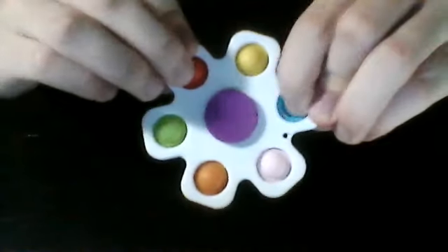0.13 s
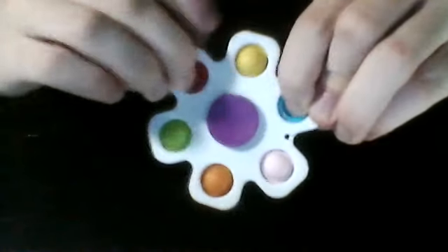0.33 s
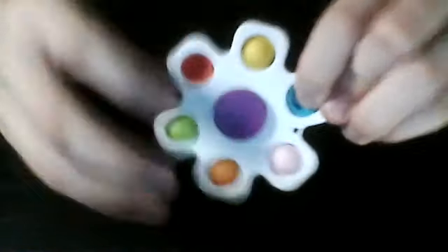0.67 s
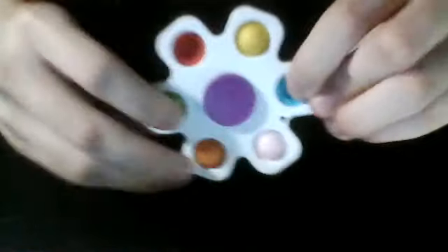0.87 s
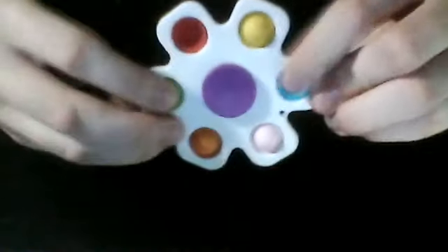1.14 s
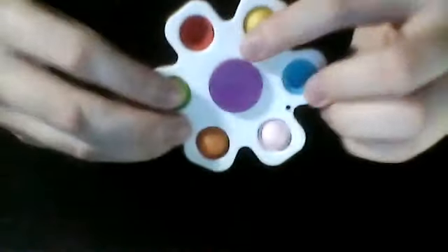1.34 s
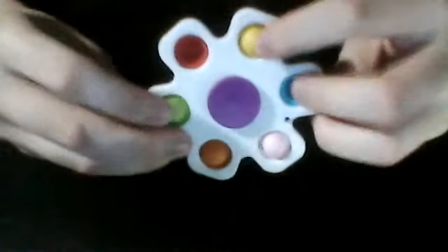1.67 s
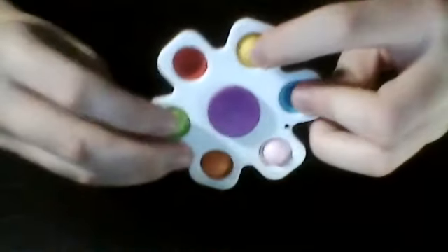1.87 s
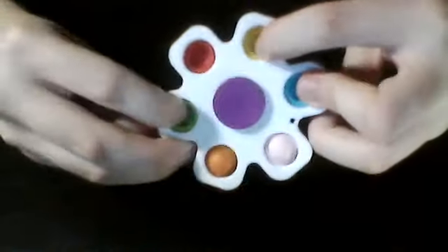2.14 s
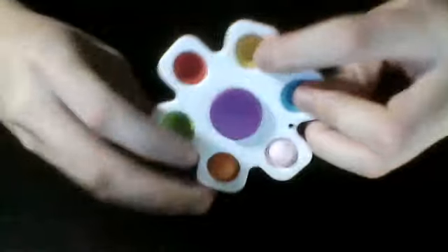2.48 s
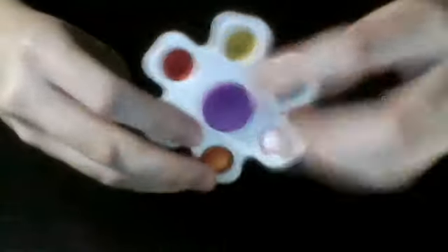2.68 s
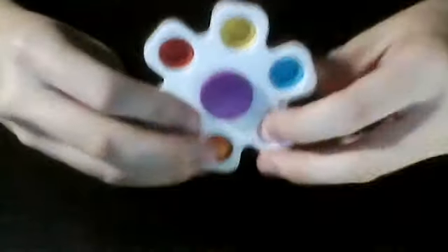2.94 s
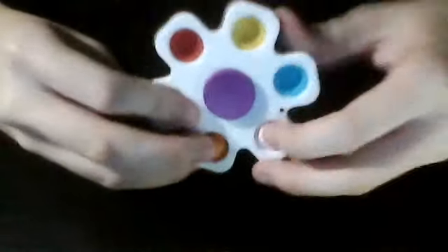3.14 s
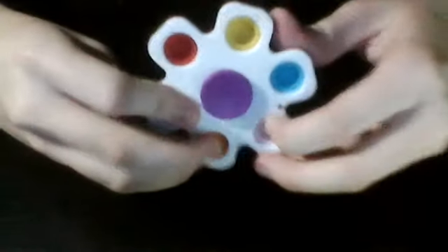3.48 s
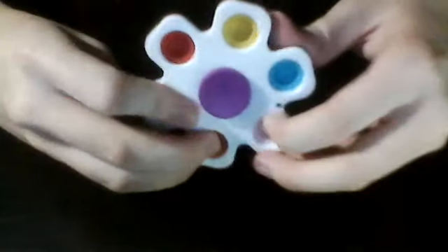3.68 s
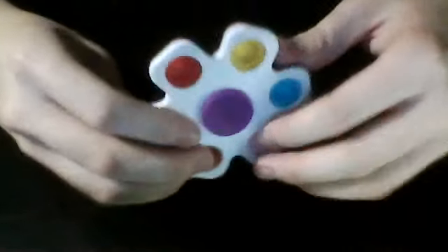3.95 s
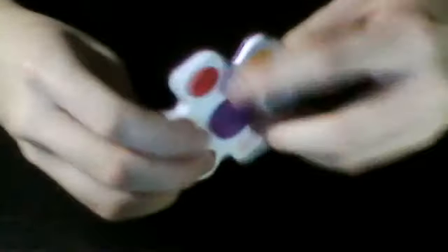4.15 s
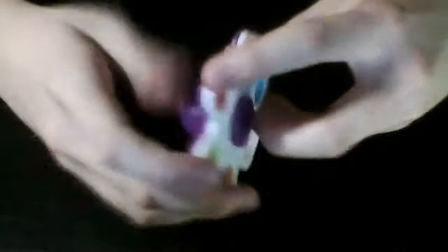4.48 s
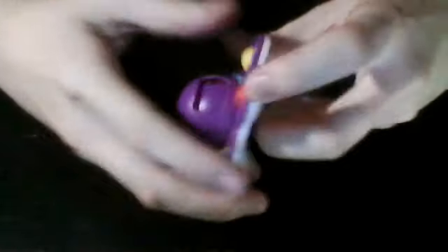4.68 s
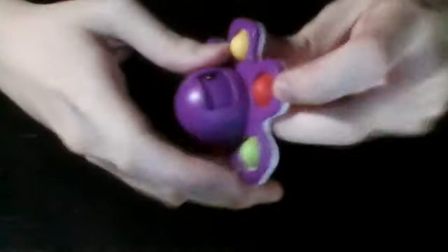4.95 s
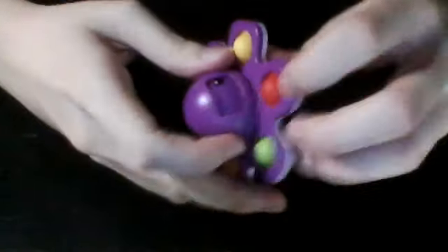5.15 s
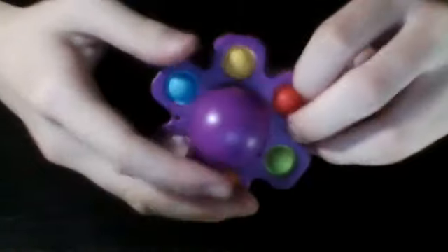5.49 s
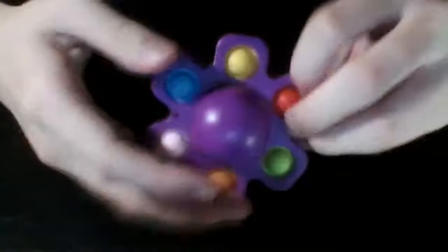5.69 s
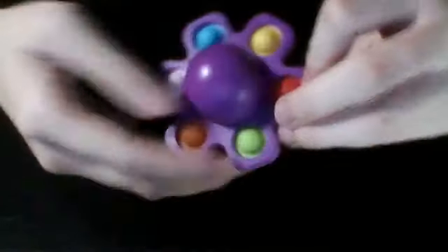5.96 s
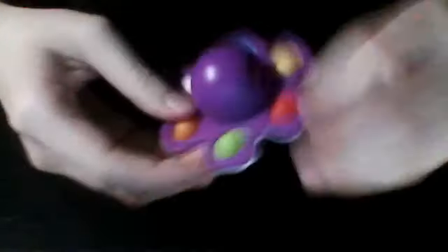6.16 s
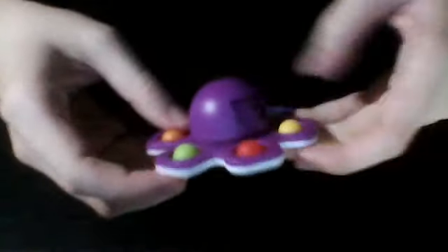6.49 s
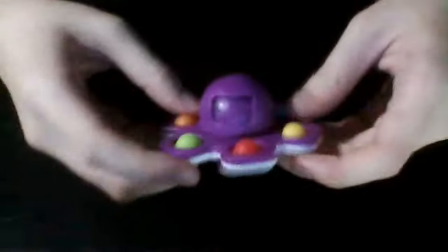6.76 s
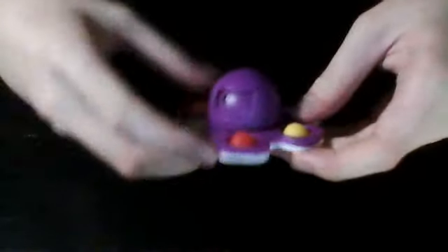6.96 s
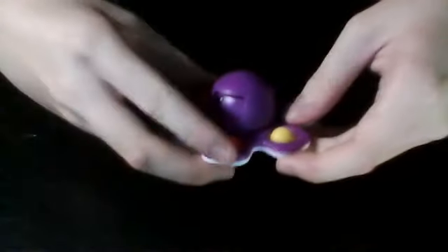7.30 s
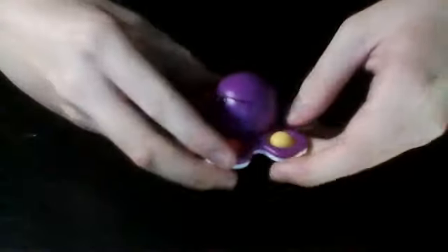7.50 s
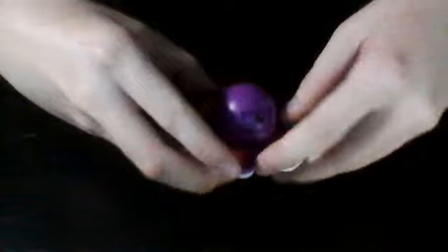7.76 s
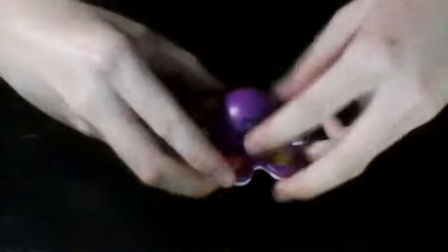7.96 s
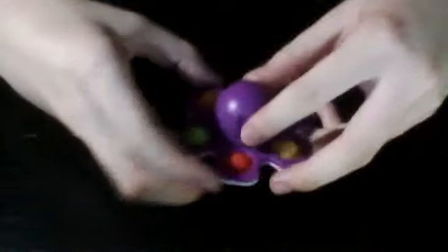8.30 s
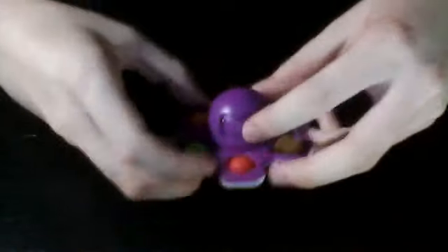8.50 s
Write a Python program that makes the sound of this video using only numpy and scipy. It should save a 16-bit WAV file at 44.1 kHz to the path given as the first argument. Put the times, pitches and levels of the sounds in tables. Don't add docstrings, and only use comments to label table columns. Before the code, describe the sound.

A small plastic fidget toy is popped and handled close to a modest microphone in a quiet furnished room. Two sharp, bright dome snaps come at about 0.16 and 0.33 seconds, followed by lighter knocks at 0.4 and scattered ticks and skin rub from 0.75 to 1.6. Another strong pop lands at 2.1 with a weak follower right behind it. A short crisp clatter of the loose hub comes around 2.7, then two pops close together at 3.5 and 3.56. Each pop rings briefly, with a short roomy tail. From 4.2 on there are no more pops, just faint clicks, rattles and sliding fingers, busier around 4.9, 5.7 to 6.1 and 6.7 to 6.9, with barely audible desk bumps near 7. It is nearly still until light clicks near 8.5. A very soft fan hiss and low hum lie underneath.

```python
import sys
import numpy as np
from scipy import signal
from scipy.fft import rfft, irfft, next_fast_len
from scipy.io import wavfile
from scipy.ndimage import uniform_filter1d

SR = 44100
rng = np.random.default_rng(int(sys.argv[2]) if len(sys.argv) > 2 else 0)


def elevation(decibels):
    levels = np.asarray(decibels, float)
    return 10 ** (levels / 20)


def store_wav(level_fs):
    pcm = np.round(np.clip(np.atleast_2d(level_fs), -1, 1) * 32767)
    wavfile.write(sys.argv[1], SR, pcm.T.astype(np.int16))


N = 380141
T = np.arange(N) / SR


def level(x, db):
    return x * elevation(db) / np.sqrt(np.mean(x ** 2))


def band(x, order, hz, kind):
    return signal.sosfilt(signal.butter(order, hz, kind, fs=SR, output="sos"), x)


def coloured(hz, db, count):
    size = next_fast_len(count)
    f = np.fft.rfftfreq(size, 1 / SR) + 1
    gain = elevation(np.interp(np.log(f), np.log(hz), db))
    return irfft(rfft(rng.standard_normal(size)) * gain, size)[:count]


def hump(start, length, edge):
    inside = np.minimum(T - start, start + length - T)
    return np.sin(np.pi / 2 * np.clip(inside / edge, 0, 1)) ** 2


def ring(x, hz, db, t60):
    decay = np.log(1000) / (max(t60, .002) * SR)
    pole = np.exp(2j * np.pi * hz / SR - decay)
    return elevation(db) * signal.lfilter([1], [1, -pole], x).imag


def strike(x, modes):
    return sum(width / 250 * ring(x, hz, db, np.log(1000) / np.pi / width) for hz, width, db in modes)


def sound_of(blows, groups):
    out = 0
    for x, group in zip(blows, groups):
        rung = sum(ring(x, *mode) for mode in group)
        edges_hz = [group[0][0] / 1.08, group[-1][0] * 1.04]
        out = out + band(rung, order=2, hz=edges_hz, kind="band")
    return out


def pops():
    # (time [s], level [dB], dome modes [dB], desk echo share [ratio], level to the walls [dB])
    snap_rows = [(0.1635, -9.5, 2.5, 0.28, -1), (0.3273, -9.5, 2.5, 0.32, 0), (2.1150, -10, 0.5, 0.4, 0.5),
                 (2.1384, -18.5, 1.5, 0.31, -10), (3.5005, -10.5, -0.43, 0.57, 0),
                 (3.5595, -12.5, -4, 0.64, -4)]
    # (frequency [Hz], width [Hz], level [dB])
    dome_modes = [
        [(3770, 260, 0), (5050, 320, 3), (5456, 240, -6.5), (5960, 140, -7.5), (6610, 210, 4.5)],
        [(3400, 180, -2), (4024, 180, -2), (4700, 280, 2.5), (5680, 300, -4), (6930, 310, -2),
         (8250, 290, -23.5)],
        [(3460, 920, -3.5), (4580, 110, -2), (6402, 800, -5), (7150, 490, -7.5)],
        [(4683, 690, 2), (5710, 660, 2), (6468, 260, -6.5), (7100, 460, 0), (8558, 380, -29)],
        [(3230, 200, -9), (4040, 330, -1), (4820, 280, 2.5), (5590, 290, 5), (7080, 440, -1)],
        [(4030, 270, 5), (4770, 370, 2), (6700, 440, -11.5), (6600, 134, -18)],
    ]
    # (frequency [Hz], width [Hz], level [dB])
    plate_modes = [(640, 59, -8), (1067, 130, -12), (1458, 190, -9), (1700, 110, 5.5), (2150, 180, -5.5),
                   (2597, 390, 3)]
    desk_delay_s, snap_s, ring_to_walls_db = .00083, .00002, -27
    size = 4096
    direct, around = np.zeros(N), np.zeros(N)
    for (s, db, dome_db, desk, wall_db), dome in zip(snap_rows, dome_modes):
        start = int(s * SR) - 64
        t = (start + np.arange(size)) / SR - s
        click = np.exp(-.5 * (t / snap_s) ** 2)
        push = click + desk * np.exp(-.5 * ((t - desk_delay_s) / snap_s) ** 2)
        cavity = elevation(dome_db + 2.5) * strike(click, dome)
        direct[start:start + size] += elevation(db - 16.5) * (strike(push, plate_modes) + cavity)
        sent = click + elevation(ring_to_walls_db) * (strike(click, plate_modes) + cavity)
        around[start:start + size] += elevation(wall_db) * sent
    return band(np.array([direct, around]), order=8, hz=466, kind="high")


def rattles():
    # (frequency [Hz], level [dB], t60 [s])
    hub_modes = [
        [(2720, -5, .022), (2860, 1, 0.021), (2850, -4.5, .022)],
        [(3830, -8.5, .03), (4540, -6, 0.0094), (4854, 2.5, 0.011), (4980, -4, 0.0098)],
        [(5570, -4.5, 0.0067), (6300, 1.5, 0.012), (6830, -3.5, .017)],
        [(7200, -5.5, 0.026), (7370, 3.5, 0.013), (7530, -0.5, 0.008), (8140, -9, .008)],
    ]
    # (frequency [Hz], level [dB], t60 [s])
    pinched_modes = [
        [(1460, -4.5, .02), (2480, -3.5, .018), (2690, 5.5, 0.031)],
        [(3600, -5, .012), (5000, -4, .008)],
        [(5460, -2, 0.0073), (6000, 0, 0.012), (6540, -1, 0.014)],
        [(6730, 2.5, .012), (7230, 2, 0.0095), (8370, -8, .008)],
    ]
    # (time [s], shell level [dB], bearing above shell [dB])
    shell_knocks = [(0.4207, -41, -7.5), (0.4316, -38.5, -14), (0.5573, -61, -6.5), (0.8273, -45.5, 4.5),
                    (.856, -52.5, -19), (.924, -58.5, 0), (0.945, -61, 4.5), (1.1012, -61, -13),
                    (1.294, -66, -6), (2.6214, -66.5, -4), (2.75, -40.5, -6.5), (2.812, -53, 3.5),
                    (2.829, -59, 0), (2.872, -58, -6), (4.3064, -55.5, -2), (4.4555, -55, -14),
                    (4.6292, -65.5, -6), (4.839, -67, -5), (5.4275, -63, -21), (5.4919, -68, -7),
                    (5.729, -64, -7), (5.7654, -60, -18), (6.715, -50.5, -8), (6.757, -57, -9),
                    (6.8355, -52.5, 4), (6.8575, -53, -3), (6.9087, -56.5, -12), (7.8995, -66, -13),
                    (8.233, -55.5, -14.5), (8.5057, -54.5, -1)]
    # (time [s], shell level [dB], bearing above shell [dB])
    rim_knocks = [(2.739, -49.5, 1), (2.771, -56, -12), (4.933, -49.5, -7), (5.1773, -69, -5),
                  (5.2895, -72, -4), (5.7079, -74, -20), (5.8132, -52.5, -12), (5.828, -55, -12),
                  (5.864, -57, -21), (6.0113, -49, -18), (6.0256, -62, -18), (6.058, -51.5, -14),
                  (6.1111, -62, -14)]
    # (time [s], shell level [dB], bearing above shell [dB])
    arm_knocks = [(1.373, -63.5, 0), (2.7214, -53, -2.5), (2.822, -64, -3), (4.2484, -63, 1),
                  (4.3494, -80, 10), (6.0796, -59, -10), (6.708, -61, -5), (6.2606, -64.5, -7),
                  (6.819, -63.5, -6), (6.848, -59, -6), (8.2766, -68, 1), (8.3294, -79, -8),
                  (8.5145, -57, -1.5), (8.5304, -56, 1), (8.5398, -61, -8), (8.5594, -61, 2)]
    # (time [s], shell level [dB], bearing above shell [dB])
    ticks = [(.150, -62, 3), (.376, -51.5, 8), (2.914, -77, 9.5), (2.963, -78, 9.5), (4.605, -66, -4),
             (4.645, -73, 4), (.812, -58, 2), (.819, -55.5, 4), (.892, -74, 14), (.907, -66, 10),
             (1.0354, -76.5, 14), (1.0855, -68, 7), (1.5484, -70.5, 12), (1.5944, -73, 16),
             (1.6594, -78, 12), (2.104, -60, 0), (2.697, -61, 6), (3.488, -72, 18), (4.492, -66.5, 7.5),
             (4.805, -72.5, 15.5), (7.6194, -76.5, 5), (7.6994, -76.5, 8), (8.4954, -69, 3)]
    # (time [s], shell level [dB], bearing above shell [dB])
    cracks = [(.828, -58.5, 4.3), (1.0735, -63, 18), (1.567, -63.5, 21.5), (2.7055, -50.5, -2),
              (2.711, -38, 5.5), (2.7165, -38, 1), (8.5255, -44, 2)]
    # (rim above shell [dB], arm above shell [dB], length [s])
    kinds = [
        (-19, -12.5, 0.00726),
        (-3, -12.5, 0.01),
        (-10, 2.5, 0.0078),
        (-8.5, -7.5, .006),
        (-4, 1, 0.00272),
    ]
    # (start [s], length [s], shell level [dB], rim and arm above shell [dB])
    slides = [(.75, .9, -87, -9.5), (2.6, .4, -82, -3), (4.17, .3, -84.5, -7), (4.744, 0.34, -83, -2),
              (5.663, 0.27, -74.5, -7.5), (5.923, 0.26, -71.5, -1), (6.682, .32, -81, -5),
              (8.15, 0.52, -90, 3)]
    rattle_db, knocks_per_s, knock_spread_db = -19, 2000, 5
    slide_db, slide_bearing_db, slide_edge_s = -22.5, -87.5, 0.072
    pinch_s = 8.45
    size = 2048

    events = []
    for rows, (rim_db, arm_db, length) in zip((shell_knocks, rim_knocks, arm_knocks, ticks, cracks), kinds):
        events += [(s, db, rim_db, arm_db, bearing_db, length) for s, db, bearing_db in rows]
    parts = len(hub_modes)
    blows = np.zeros((parts, N))
    t = np.arange(size) / SR
    for s, db, *others_db, length in events:
        age = t / max(length, .001)
        swell = age * np.exp(-age ** 2)
        knocks = rng.random(size) < knocks_per_s / SR
        signs = np.sign(rng.standard_normal((parts, size)))
        sizes = elevation(knock_spread_db * rng.standard_normal((parts, size)))
        volley = swell * knocks * signs * sizes
        volley *= np.sqrt(np.sum(swell ** 2) / np.sum(volley ** 2 + 1e-12, axis=1))[:, None]
        part_db = db + np.array([0] + others_db)[:, None]
        start = int((s - .002) * SR)
        blows[:, start:start + size] += elevation(rattle_db) * (volley * elevation(part_db))[:, :N - start]

    unevenness_db = 3.6 * level(uniform_filter1d(rng.standard_normal(N), 400), 0)
    patter = rng.standard_normal((parts, N)) * elevation(unevenness_db)
    for s, length, db, rim_db in slides:
        part_db = np.array([db, db + rim_db, db + rim_db, slide_bearing_db])[:, None]
        blows += patter * hump(s, length, slide_edge_s) * elevation(slide_db + part_db)

    pinch = int(pinch_s * SR)
    hub = band(sound_of(blows * (T < pinch_s), hub_modes), order=4, hz=2285, kind="high")
    hub[pinch:] += sound_of(blows[:, pinch:], pinched_modes)
    return hub


def bumps():
    # (time [s], level [dB], frequency [Hz], t60 [s])
    bump_rows = [
        (3.08, -64, 198, 0.24),
        (6.811, -61, 170, 0.22),
        (6.86, -62, 191, .2),
        (6.808, -62, 630, .08),
        (6.852, -63, 612, 0.11),
        (6.976, -61.5, 625, 0.14),
        (7.02, -64, 620, .15),
    ]
    out = 0
    for s, db, hz, t60 in bump_rows:
        push = np.exp(-.5 * ((T - s) * hz / 0.23) ** 2) * hz / 9300
        out = out + ring(push, hz, db, t60)
    return out


def room(direct, around):
    # (frequency [Hz], t60 [s], level [dB])
    wall_bands = [(450, .3, -11), (630, 0.36, -3.5), (1004, 0.39, 0), (1650, 0.38, -1.5),
                  (2670, 0.35, -0.5), (3300, 0.19, -6), (4350, 0.35, -4.5), (5400, 0.27, -2),
                  (6870, .33, 0.5), (7980, 0.19, -5)]
    wall_s, wall_rise_s, near_db, near_t60_s = 0.012, .002, -14.5, 0.041
    size = 32768
    t = np.arange(size) / SR
    tail = 0
    for hz, t60, db in wall_bands:
        part = coloured([hz / 1.9, hz / 1.12, hz * 1.173, hz * 1.2], [-29.5, -1, 0.0, -29.5], count=size)
        tail = tail + elevation(db - 60 * t / t60) * part
    onset = 1 / (1 + np.exp(np.clip((wall_s - t) / wall_rise_s, -50, 50)))
    tail = tail / np.sqrt(np.sum(tail ** 2)) * onset
    near = rng.standard_normal(size) * elevation(-60 * t / near_t60_s) * (t > .001)
    near = near / np.sqrt(np.sum(near ** 2)) * elevation(near_db)
    return (signal.fftconvolve(around, tail) + signal.fftconvolve(direct, near))[:N]


def fan_tones():
    # (frequency [Hz], level [dB])
    tones = [
        (167, -84.5),
        (277, -81),
    ]
    return sum(level(coloured([hz - 9, hz, hz + 9], [-40, 0, -40], count=N), db) for hz, db in tones)


def fan_hiss():
    # (frequency [Hz], density [dB per Hz])
    air_spectrum = [(65, -31.5), (110, -2), (123, -5), (174, -3.5), (272, -7.5), (303, -7), (327, -6.5),
                    (635, -6), (736, -15), (989, -6.5), (1100, -9), (1630, -11.5), (2440, -18.5),
                    (7250, -32), (9050, -46.5), (11800, -72.5), (19900, -120)]
    return level(coloured(*np.transpose(air_spectrum), count=N), -70.5)


def house_hums():
    # (frequency [Hz], width [Hz])
    hum_bands = [
        (54, 25),
        (96, 15),
    ]
    # (time [s], level [dB], length [s])
    low_swells = [(0.023, -58.5, .1), (.23, -61, 0.36), (.44, -65.5, 0.11), (.6, -76, .3), (2.16, -63, .22),
                  (2.721, -73, .2), (3.679, -70, .12), (3.821, -71, .1), (3.961, -74, 0.099),
                  (4.078, -75, .1), (4.221, -70, .1), (4.37, -84, .1), (4.48, -83, .1), (4.63, -74, .1),
                  (4.94, -79, 0.14), (5.4, -79, .25), (5.807, -65, 0.5), (6.15, -75, .4), (6.43, -68, .12),
                  (6.83, -72, 0.13), (7.61, -75, 0.14), (8.06, -75, .1), (8.271, -67.5, .2),
                  (8.57, -67, 0.11)]
    # (time [s], level [dB], length [s])
    upper_swells = [(.04, -62.5, 0.11), (.25, -70.5, .3), (1.53, -76, 0.25), (1.96, -84, 0.091),
                    (2.18, -66.5, .14), (4.08, -72.5, .1), (4.63, -81, .12), (5.54, -77, 0.22),
                    (6.79, -72, .12), (8.16, -74, 0.17), (8.57, -75, .1)]
    rest_levels_db, wobble_db, wobbles_per_s = (-76.5, -79), 3.5, 9
    span = int(SR / wobbles_per_s)
    out = 0
    for (hz, width), rest_db, swells in zip(hum_bands, rest_levels_db, (low_swells, upper_swells)):
        points_hz = [hz - 2 * width, hz - width / 2, hz, hz + width / 2, hz + 2 * width]
        hum = coloured(points_hz, [-38.5, 1, 10, 6, -45.5], count=N)
        envelope = np.abs(signal.hilbert(hum, next_fast_len(N))[:N])
        hum = hum / (envelope + .4 * np.std(hum))
        wobble = uniform_filter1d(uniform_filter1d(rng.standard_normal(N), span), span)
        rest = elevation(rest_db + wobble_db * level(wobble, 0))
        swell = sum(elevation(db) * hump(s - length / 2, length, length / 2) for s, db, length in swells)
        out = out + level(hum, 0) * (rest + swell)
    return out


def scene():
    pop_wall_db, hub_wall_db = -16, -16.5
    snaps, clicks = pops()
    hub = rattles()
    toy = snaps + hub
    to_walls = elevation(pop_wall_db) * clicks + elevation(hub_wall_db) * hub
    heard = toy + room(toy, to_walls)
    return (heard + bumps() + fan_tones() + fan_hiss() + house_hums())[None, :]


def low_pass(x):
    return signal.sosfilt(signal.butter(12, 9200, fs=SR, output="sos"), x)


def record(dry):
    x = band(dry, order=6, hz=7680, kind="low")
    x = band(x, order=6, hz=37.3, kind="high")
    x = signal.sosfilt(signal.ellip(10, .2, 90, 8900, fs=SR, output="sos"), x)
    return low_pass(x)


dry = scene()
out = record(dry)
store_wav(out)
```